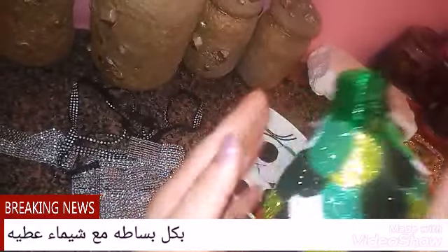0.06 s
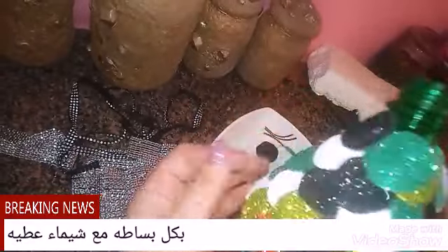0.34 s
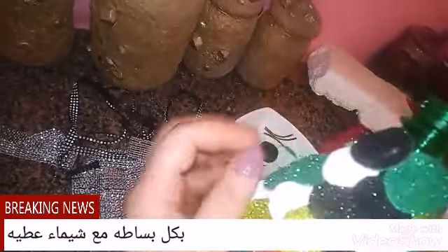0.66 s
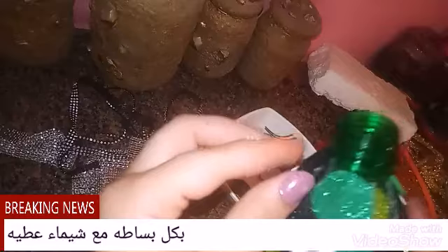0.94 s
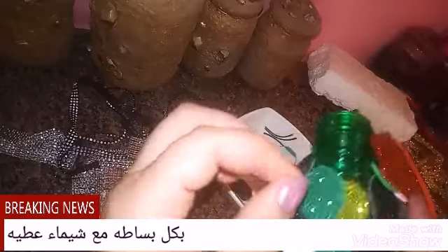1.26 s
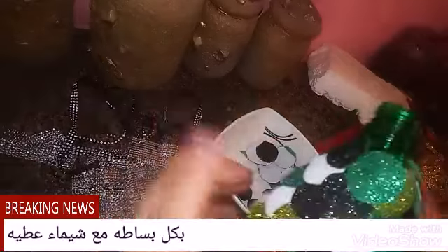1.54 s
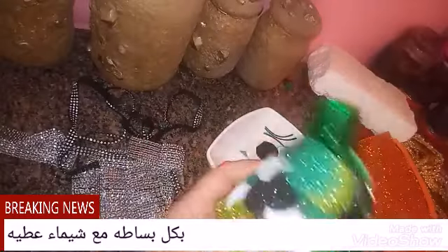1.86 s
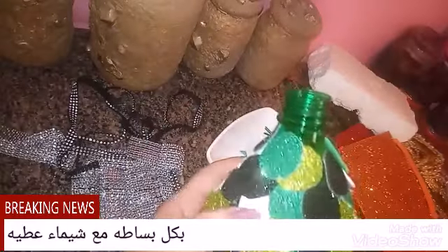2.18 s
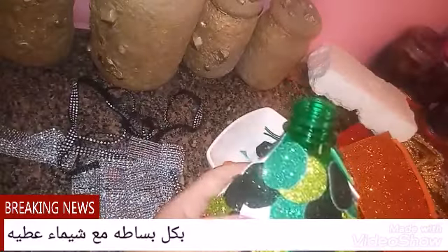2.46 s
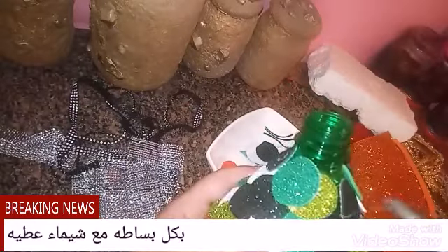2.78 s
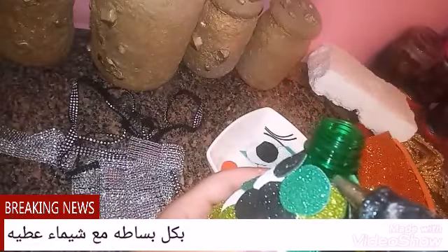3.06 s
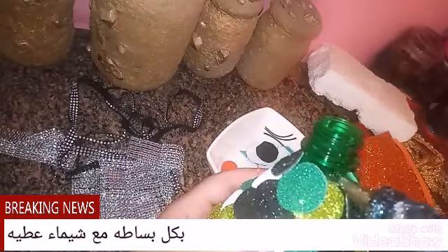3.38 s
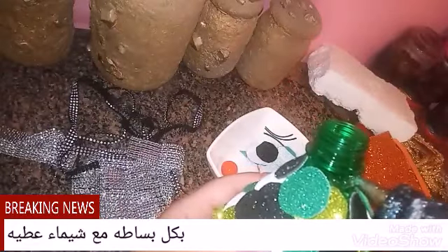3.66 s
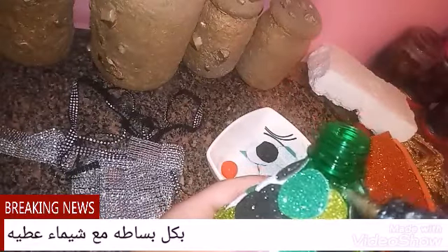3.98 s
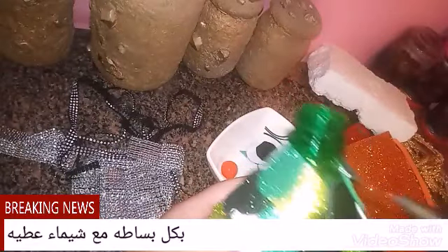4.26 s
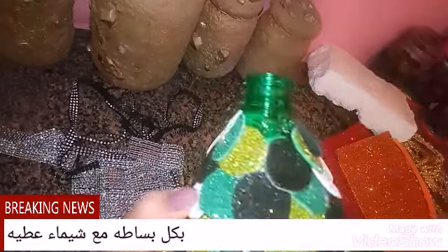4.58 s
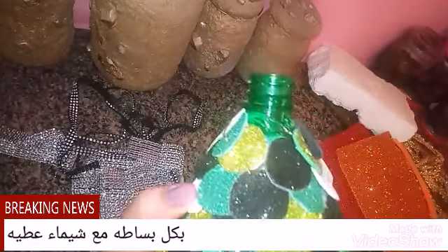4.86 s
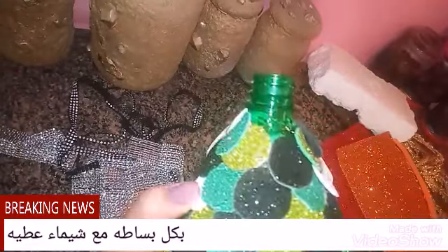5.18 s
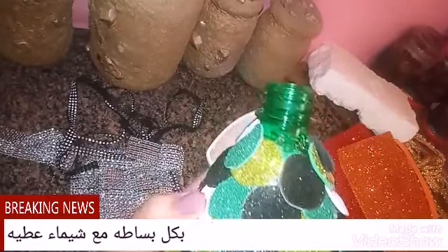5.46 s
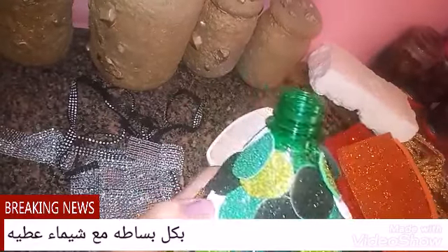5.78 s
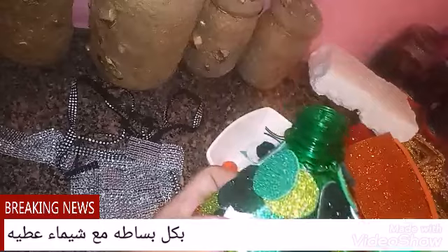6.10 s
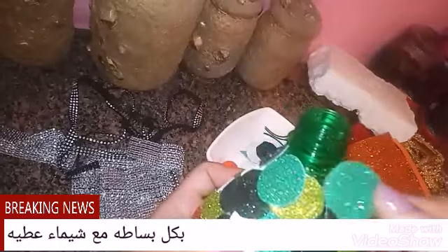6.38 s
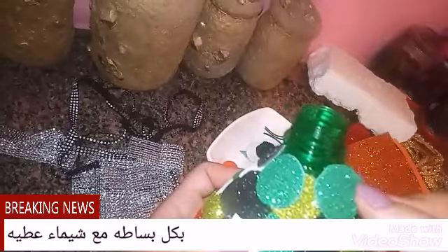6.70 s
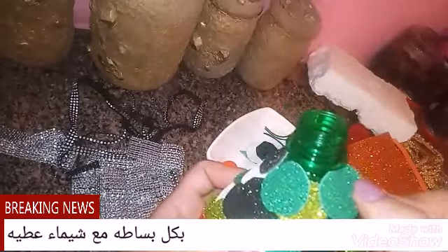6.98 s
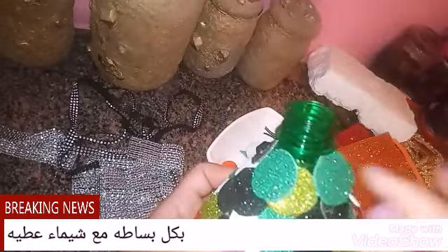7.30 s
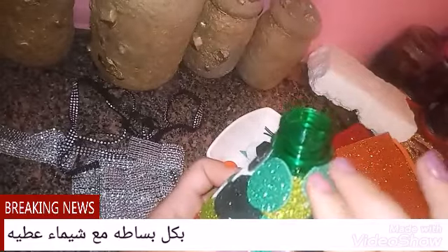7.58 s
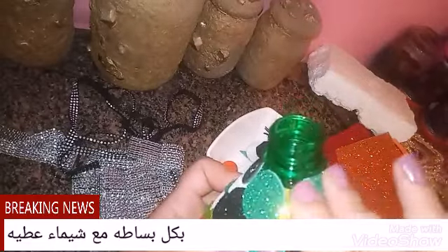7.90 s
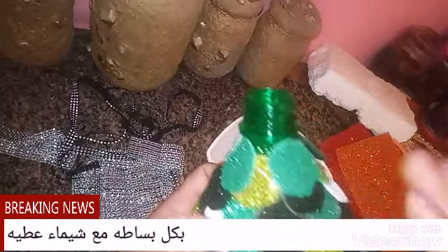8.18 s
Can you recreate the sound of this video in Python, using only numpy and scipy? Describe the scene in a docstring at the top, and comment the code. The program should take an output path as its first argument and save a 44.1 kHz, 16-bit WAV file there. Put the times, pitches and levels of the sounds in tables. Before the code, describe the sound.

Quiet trigger clicks, one tiny squeak and fingers brushing a plastic bottle open the scene, with a few soft hand thumps. Then a glue gun clatters onto a table in several hard, briefly ringing knocks, the loudest sound by far. Afterwards the bottle gives a few more light clicks and rubs. It all happens near a muffled, hollow-sounding microphone in a small room with soft air noise and a faint low hum.

```python
"""Hot glue gun and plastic bottle

In a small room, the trigger and bottle click, fingers press and rub the plastic, and hands thump softly.
The glue stick squeaks once. The gun is put down with a few knocks that make the table ring.
Behind it all are room air and a faint hum. The microphone sounds hollow and dull, because its
opening rings strongly and lets little treble through."""
import sys
import numpy as np
from scipy import signal
from scipy.fft import rfft, irfft
from scipy.io import wavfile

SR = 44100
rng = np.random.default_rng(int(sys.argv[2]) if len(sys.argv) > 2 else 0)


def to_wav(sig):
    """Store sig (one row per channel, or 1-D mono) as 16-bit WAV at the path in sys.argv[1].

    Samples outside -1..1 are clipped; the rate is SR.
    """
    pcm = np.clip(np.atleast_2d(sig), -1, 1) * 32767
    pcm = np.round(pcm).astype(np.int16)
    wavfile.write(sys.argv[1], SR, pcm.T)  # frames by channels


N = 367871

# Hard knocks; the heavier ones land edge first, then flat:
# t/s, blow level/dB, blow f/Hz, crack level/dB, boom level/dB, how strongly the table rings
GUN_KNOCKS = [(2.397, -40.5, 396, -57.5, -58, 0.53), (4.8914, -33.5, 312, -47, -40, 0.63),
              (4.921, -48.5, 405, -56, -52.5, 0.78), (4.954, -29.5, 348, -43, -45.5, 0.74),
              (4.9557, -34.5, 1190, -53, -63, 1.26), (5.089, -28.5, 1200, -32, -38, 0.54),
              (5.094, -27, 786, -42.5, -55, 0.47), (5.1235, -16.5, 590, -25.5, -25.5, 0.58),
              (5.1277, -21, 1150, -37, -40, 0.13)]
# The notes of the table top: f/Hz, level/dB relative to the blow, time to fade by 60 dB/s
TABLE_NOTES = [(294, 10, 0.24), (460, -10, 0.19), (482, 6, 0.16), (645, -12, 0.069), (679, -5.5, 0.06),
               (750, -3, 0.1), (742, 11.5, 0.05), (855, 8.5, 0.32), (934, 18.5, 0.077), (883, 6.5, 0.061),
               (1115, -3, .2), (1250, 6, 0.11), (1680, -10, 0.23)]

def knocks(crack_fade_s=0.0084, crack_hz=2900, boom_hz=135, boom_fade_s=0.21, chatter_s=0.0054):
    """The gun hits with a push and rebound, a crack and a chatter of tiny contacts; the table rings."""
    t, out = np.arange(SR // 2) / SR, np.zeros(N)
    table = np.zeros(len(t))
    for hz, db, fade_s in TABLE_NOTES:
        fade = die_away(t, fade_s)
        table += 2 * gain(db) * fade / fade.sum() * np.cos(2 * np.pi * hz * t)
    boom = tone(t, boom_hz) * die_away(t, boom_fade_s) * fade_in(t, rise_s=0.014)
    settling = t / chatter_s * np.exp(1 - t / chatter_s)
    for at, blow_db, hz, crack_db, boom_db, ring_share in GUN_KNOCKS:
        phase = 2 * np.pi * hz * (t - .002)
        push = -phase * np.exp((1 - phase ** 2) / 2)
        chatter = .33 * settling * noise_band(t, hz, octaves=0.56)
        ring = ring_share * signal.fftconvolve(push, table)[:len(t)]
        crack = noise_band(t, crack_hz, octaves=0.91) * np.exp(-t / crack_fade_s)
        add(out, at, gain(blow_db) * (push + chatter + ring) + gain(crack_db) * crack + gain(boom_db) * boom)
    return out


# Clicks of trigger and bottle: t/s, snap level/dB, snap f/Hz, hollow note level/dB
PLASTIC_CLICKS = [(0.781, -51, 3070, -46), (2.256, -44, 2030, -40.5), (2.275, -64, 1500, -54),
                  (2.641, -60, 1520, -49.5), (3.662, -50, 3450, -63), (3.962, -48, 3800, -56),
                  (4.1, -52.5, 1430, -83), (4.756, -48, 4700, -43.5), (4.777, -50.5, 2600, -43.5),
                  (5.036, -46, 2570, -45), (5.222, -40, 3400, -60), (6.001, -44.5, 4400, -47.5),
                  (6.795, -50, 1780, -41.5), (7.171, -51, 1900, -58)]
HOLLOW_HZ = 880.2  # the hollow note that handling sets ringing in the microphone's opening

def clicks(snap_boost_db=2, note_trim_db=-1, snap_fade_s=0.0078, note_s=0.0019,
           shell_hz=1290, shell_db=-2.5, shell_fade_s=0.0047):
    """Plastic snaps in a few milliseconds; its shell rings briefly over the microphone's hollow note."""
    t, out = np.arange(SR // 10) / SR, np.zeros(N)
    note = tone(t, HOLLOW_HZ) * t / note_s * np.exp(-t / note_s)
    shell = gain(shell_db) * tone(t, shell_hz) * np.exp(-t / shell_fade_s)
    for at, snap_db, hz, note_db in PLASTIC_CLICKS:
        snap = noise_band(t, hz, octaves=0.82) * np.exp(-t / snap_fade_s)
        click = (snap + shell) * fade_in(t, rise_s=0.00054)
        add(out, at, gain(snap_db + snap_boost_db) * click + gain(note_db + note_trim_db) * note)
    return out


# Finger presses: t/s, half length/s, drag level/dB, rasp level/dB, hollow note level/dB
FINGER_PRESSES = [(0.069, 0.009, -58, -50, -49.5), (0.711, 0.016, -72, -51, -54),
                  (1.781, 0.007, -68, -60.5, -65), (1.913, 0.0052, -61.5, -54, -54),
                  (2.568, 0.0068, -73, -54, -74), (6.011, 0.0044, -80, -38, -44),
                  (6.861, 0.0093, -73, -71, -61), (7.165, 0.0064, -59, -53, -67.5)]

def presses(trim_db=-1, body_db=-13, drag_lead_s=0.038):
    """A finger drags, then the plastic gives with a rasp and a dull rub; the microphone's opening rings."""
    t, out = np.arange(-SR // 8, SR // 8) / SR, np.zeros(N)
    for at, half_s, drag_db, rasp_db, note_db in FINGER_PRESSES:
        drag = gain(drag_db) * swell(t + drag_lead_s, half_s=0.017)
        give = gain(rasp_db) * swell(t, 1.46 * half_s)
        rasp = gain(trim_db) * (drag + give) * keep_band(slips(t), hz=3200, octaves=1)
        note = gain(trim_db) * swell(t, half_s) * mic_ring(t)
        body = gain(body_db) * swell(t, 2.56 * half_s) * noise_band(t, hz=500, octaves=1)
        add(out, at + t[0], rasp + gain(note_db) * (note + body))
    return out


# Fingers and nozzle brushing the bottle: middle t/s, half length/s, level/dB, f/Hz
LIGHT_RUBS = [(0.292, 0.016, -65, 1900), (0.747, 0.023, -54.5, 3530), (1.2, 0.027, -67, 4800),
              (2.329, 0.062, -59, 1000), (6.831, 0.045, -64.5, 2310), (7.67, 0.024, -63, 3070),
              (8.005, 0.041, -66, 1100), (8.15, 0.017, -65.5, 3180)]

def rubs(rasp_db=-1, note_db=-14, rustle_db=-8):
    """A rub is one swell of tiny slips, over a dull rustle and a faint ring of the microphone's opening."""
    t, out = np.arange(-SR // 5, SR // 5) / SR, np.zeros(N)
    for at, half_s, db, hz in LIGHT_RUBS:
        rasp = gain(rasp_db) * keep_band(slips(t), hz, octaves=1.46)
        rustle = gain(rustle_db) * noise_band(t, hz=450, octaves=0.75)
        note = gain(note_db) * mic_ring(t)
        add(out, at + t[0], gain(db) * swell(t, half_s) * (rasp + rustle + note))
    return out


def squeak(at_s=0.684, db=-46.5):
    """The glue stick squeaks in the gun as its slips lock onto nearly one pitch."""
    t, out = np.arange(-SR // 10, SR // 10) / SR, np.zeros(N)
    squeal = keep_band(slips(t), hz=2530, octaves=0.089)
    add(out, at_s + t[0], gain(db) * swell(t, half_s=0.009) * squeal)
    return out


def slips(t, per_s=700, grain_db=5):
    """Surfaces rubbing together: tiny slips of uneven size over a smooth hiss."""
    sizes = gain(grain_db * np.minimum(rng.exponential(1, len(t)), 3))
    hiss = rng.standard_normal(len(t))
    slipping = rng.random(len(t)) < per_s / SR
    return hiss * (.5 + sizes * slipping)


def mic_ring(t, flutter=0.55):
    """A fluttering, hollow ring of the microphone's opening, set off by a press or rub."""
    return tone(t, HOLLOW_HZ) + flutter * noise_band(t, HOLLOW_HZ, octaves=0.25)


# Soft thumps of handling:
# middle t/s, half length/s, low note level/dB, high note level/dB, rebound level/dB relative to low note
HAND_THUMPS = [(1.568, 0.028, -47.5, -50.5, -14), (2.322, 0.021, -44.5, -47.5, -3.5),
               (2.895, 0.027, -45.5, -67, -9), (3.852, 0.012, -54.5, -57, -8), (4.35, 0.022, -65, -62.5, 2),
               (6.3, 0.15, -78, -67, -2.5)]

def thumps(low_hz=107.5, high_hz=166.8, high_lag_s=0.027, rebound_s=0.091, rumble=0.38):
    """A low note swells, then a higher one, and the hand settles again; rumble blurs all three."""
    t, out = np.arange(-SR // 2, SR // 2) / SR, np.zeros(N)
    for at, half_s, low_db, high_db, rebound_db in HAND_THUMPS:
        parts = [(0, low_hz, low_db), (high_lag_s, high_hz, high_db),
                 (rebound_s, low_hz, low_db + rebound_db)]
        for lag, hz, db in parts:
            note = tone(t, hz) + rumble * noise_band(t, hz, octaves=0.48)
            add(out, at + lag + t[0], gain(db) * swell(t, half_s) * note)
    return out


# The tone of the room air: f/Hz, relative level/dB
AIR_COLOUR = [(25, -6.5), (55, -12.5), (90, -4.5), (150, 0.5), (240, -8), (380, -8.5), (600, -9),
              (870, -9.5), (1300, -14.5), (2500, -12), (3250, -19), (4000, -20), (5500, -22), (9000, -26)]
# Its low part, in one list for gluing and one for turning the bottle: t/s, relative level/dB
HAND_STIR = [
    [(0.15, -62), (0.45, -64), (1.91, -60.5), (4.6, -59.5)],
    [(5.5, -56.5), (5.7, -60.5), (6.9, -57.5), (8.34, -60.5)],
]

def room_air(air_db=-64.5, low_below_hz=1200, average_stir_db=-2):
    """A steady rush of air, whose low part swells as the hands move."""
    colour = gain(look_up(AIR_COLOUR, np.fft.rfftfreq(N, 1 / SR)))
    air = gain(air_db) * unit_level(irfft(rfft(rng.standard_normal(N)) * colour, N))
    low = signal.sosfiltfilt(signal.butter(2, low_below_hz, fs=SR, output="sos"), air)
    stir_db = np.interp(np.arange(N) / SR, *np.vstack(HAND_STIR).T)
    stir = gain(average_stir_db + stir_db - stir_db.mean())
    return air + (stir - 1) * low


# The notes of the hum: f/Hz, level/dB
HUM_NOTES = [(145.3, -83.5), (290.7, -83)]

def hum(waver=0.54):
    """Two faint, low notes, each slowly wavering in loudness."""
    t, out = np.arange(N) / SR, np.zeros(N)
    for hz, db in HUM_NOTES:
        wobble = 1 + waver * noise_band(t, hz=1.8, octaves=1)
        out += gain(db) * np.sqrt(2) * tone(t, hz) * wobble
    return out


# How long the room rings: f/Hz, time to fade by 60 dB/s
ROOM_FADE = [(100, 0.29), (800, 0.28), (3000, 0.19), (8000, 0.16)]
# Echoes off nearby surfaces: delay/s, relative strength
NEAR_ECHOES = [(.0052, 0.026), (.0205, 0.18), (.031, .12), (0.0619, 0.097)]

def room(x, tail_db, echo_scale=1):
    """The room adds a few near echoes and a smooth tail whose treble dies first."""
    hz, t, bands = signal.stft(rng.standard_normal(SR // 2), SR, nperseg=256)
    bands = bands * die_away(t, look_up(ROOM_FADE, hz)[:, None]) * fade_in(t, rise_s=0.0031)
    tail = signal.istft(bands, SR, nperseg=256)[1]
    response = gain(tail_db) * tail / np.linalg.norm(tail)
    for delay, strength in NEAR_ECHOES:
        add(response, delay, np.array([echo_scale * strength]))
    return x + signal.fftconvolve(x, response)[:N]


def gain(db):
    """Turns decibels into a multiplier."""
    return 10 ** (np.asarray(db) / 20)


def tone(t, hz):
    """A pure note."""
    return np.sin(2 * np.pi * hz * t)


def fade_in(t, rise_s):
    """Climbs from 0 towards 1."""
    return 1 - np.exp(-t / rise_s)


def die_away(t, fade_s):
    """Falls by 60 dB in fade_s."""
    return np.exp(-np.log(1000) * t / fade_s)


def swell(t, half_s):
    """A smooth rise and fall around t = 0."""
    return np.exp(-.5 * (t / half_s) ** 2)


def unit_level(x):
    """Scales a sound to an average power of 1."""
    return x / np.sqrt(np.mean(x ** 2) + 1e-20)


def keep_band(x, hz, octaves):
    """Keeps the pitches around hz, at a power of 1."""
    octaves_away = np.log2((np.fft.rfftfreq(len(x), 1 / SR) + 1) / hz)
    return unit_level(irfft(rfft(x) * swell(octaves_away, octaves), len(x)))


def noise_band(t, hz, octaves):
    """Noise centred on one pitch."""
    return keep_band(rng.standard_normal(len(t)), hz, octaves)


def look_up(points, hz):
    """Reads between the rows of a (f/Hz, value) table, with octaves evenly spaced."""
    row_hz, values = np.transpose(points)
    return np.interp(np.log(hz + 1), np.log(row_hz + 1), values)


def add(mix, at_s, sound):
    """Mixes a sound in, starting at at_s."""
    start = round(at_s * SR)
    sound = sound[max(-start, 0):]
    part = mix[max(start, 0):][:len(sound)]
    part += sound[:len(part)]


def scene():
    """Knocks and small handling sounds in the room, over air and hum."""
    handling = clicks() + presses() + rubs() + squeak()
    handling = room(handling, tail_db=-10, echo_scale=0.15)  # near the microphone, so less echo
    return (room(knocks(), tail_db=-8) + handling + thumps() + room_air() + hum())[None]


# The microphone's dull tone: f/Hz, level/dB
MIC_COLOUR = [(25, -12), (70, 9.5), (400, 2.5), (650, 7.5), (1000, 6.5), (1450, 0), (2300, -3.5),
              (4000, -2), (4700, -10.5), (5400, -22), (7000, -24), (10000, -36), (15000, -39)]
# The notes its opening rings at: f/Hz, width/Hz, boost/dB
MIC_RINGS = [(856.8, 56, 13.8), (3217, 75, 10.7), (6420, 100, 17.8), (8870, 190, 19)]

def record(dry, hiss_db=-80.5, top_hz=15500):
    """The microphone dulls the sound, rings, adds its own hiss and cuts the highest treble."""
    size = 16384
    hz = abs(np.fft.fftfreq(size, 1 / SR))
    peaks = 1 + sum((gain(db) ** 2 - 1) / (1 + (2 * (hz - f) / width) ** 2) for f, width, db in MIC_RINGS)
    log_gain = np.log(gain(look_up(MIC_COLOUR, hz))) + .5 * np.log(peaks)
    spectrum = np.exp(np.conj(signal.hilbert(log_gain)))  # rings after each sound, never before
    response = np.fft.ifft(spectrum).real[:size // 4]
    coloured = signal.oaconvolve(dry, response[None])[:, :N]
    hiss = gain(hiss_db) * rng.standard_normal(N)
    treble_cut = signal.firwin(511, top_hz, window=("kaiser", 9), fs=SR)
    return signal.oaconvolve(coloured + hiss, treble_cut[None], "same")


dry = scene()
out = record(dry)
to_wav(out)
```